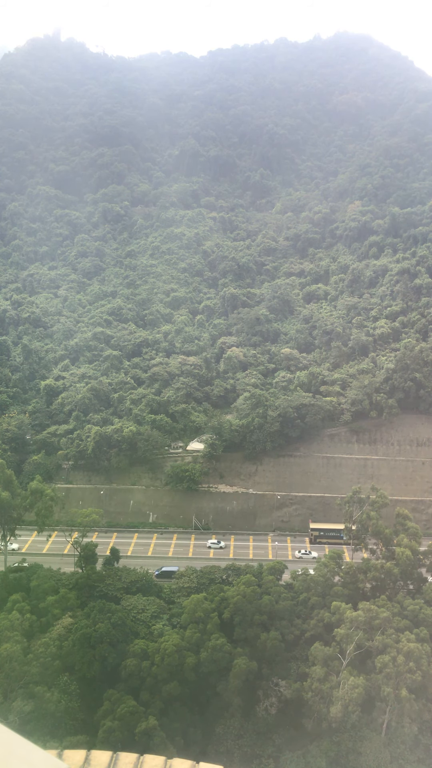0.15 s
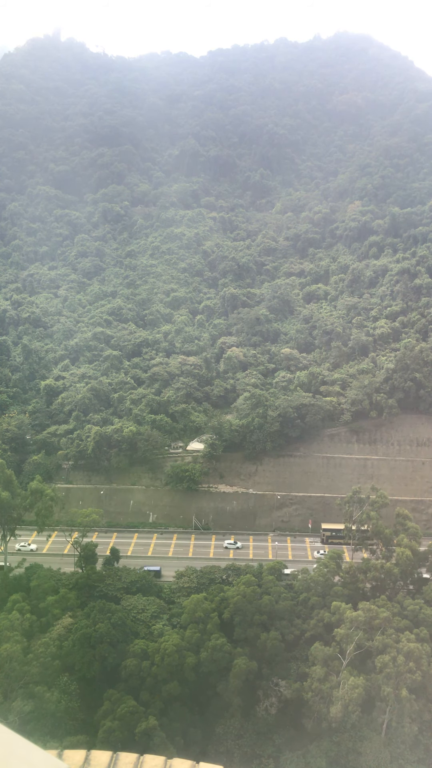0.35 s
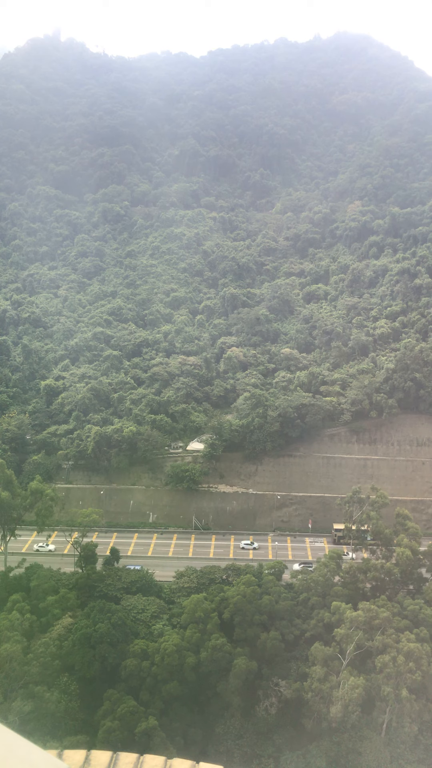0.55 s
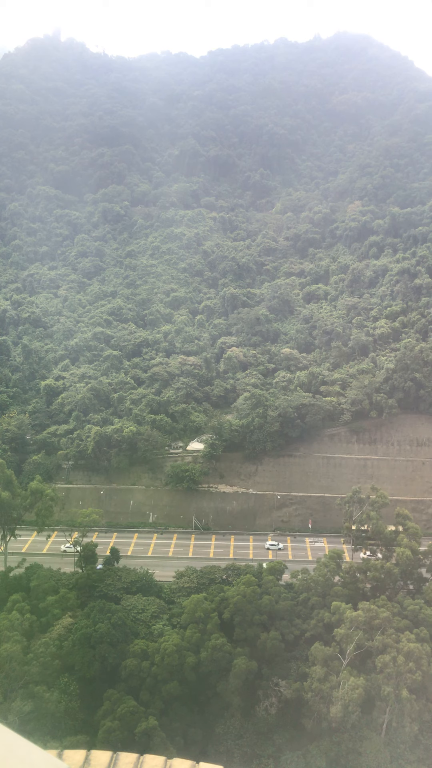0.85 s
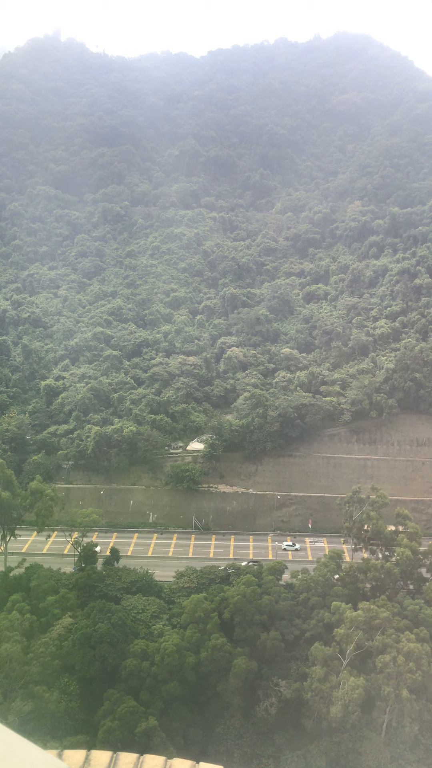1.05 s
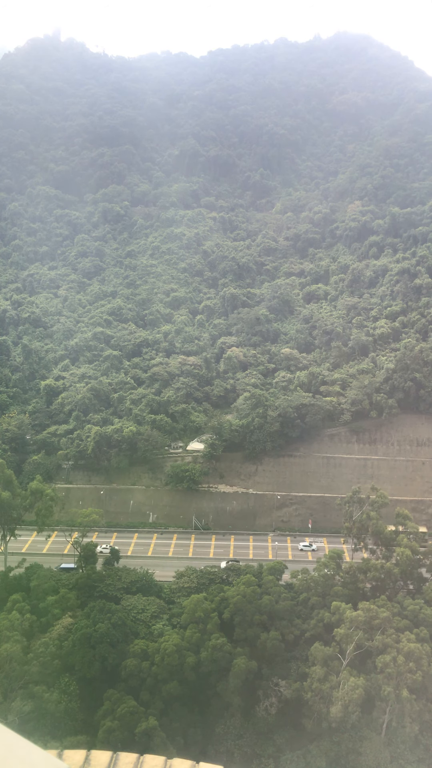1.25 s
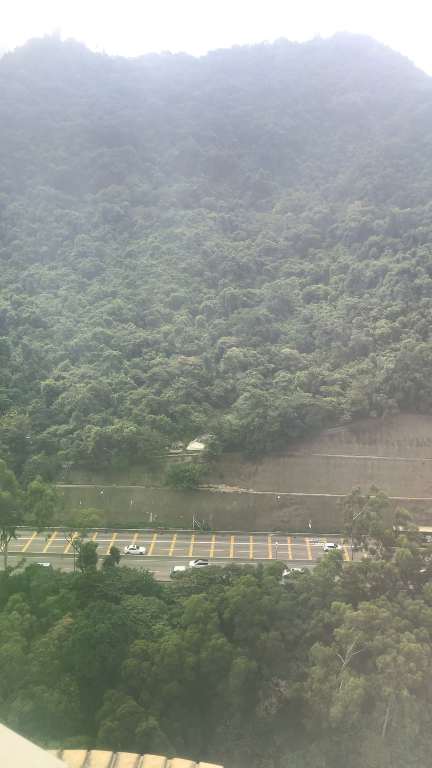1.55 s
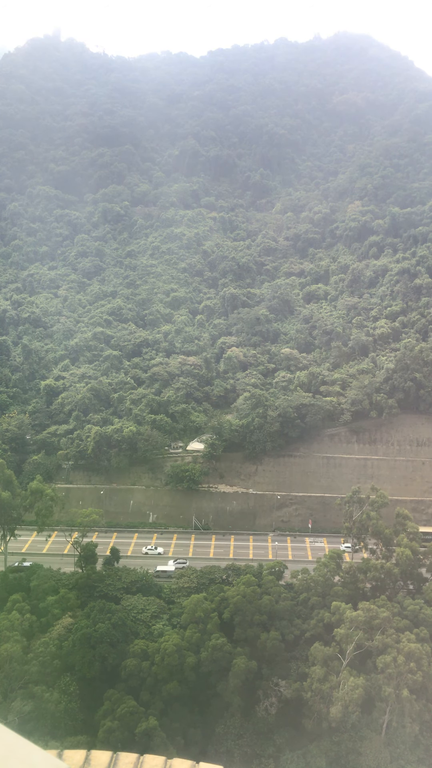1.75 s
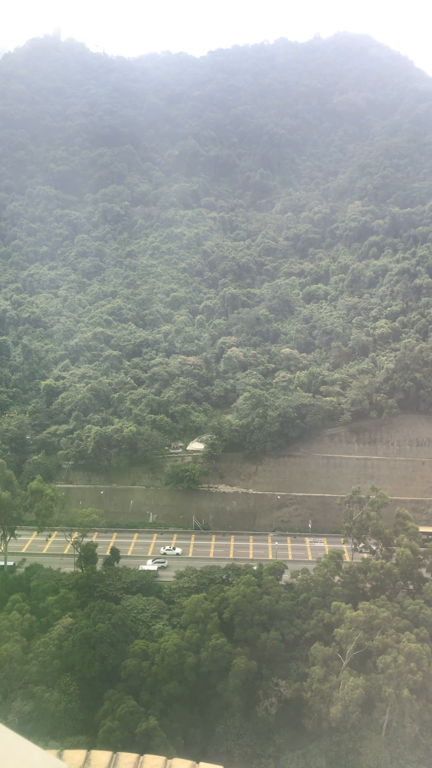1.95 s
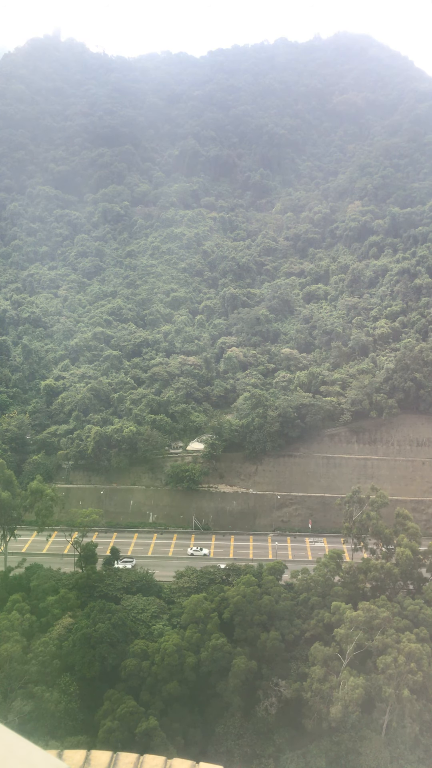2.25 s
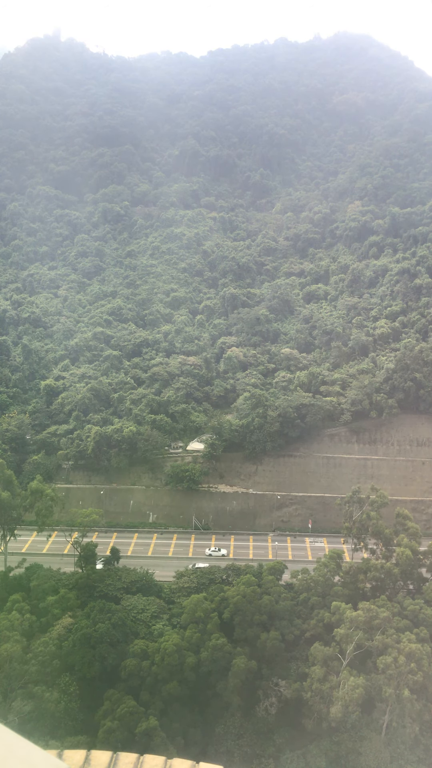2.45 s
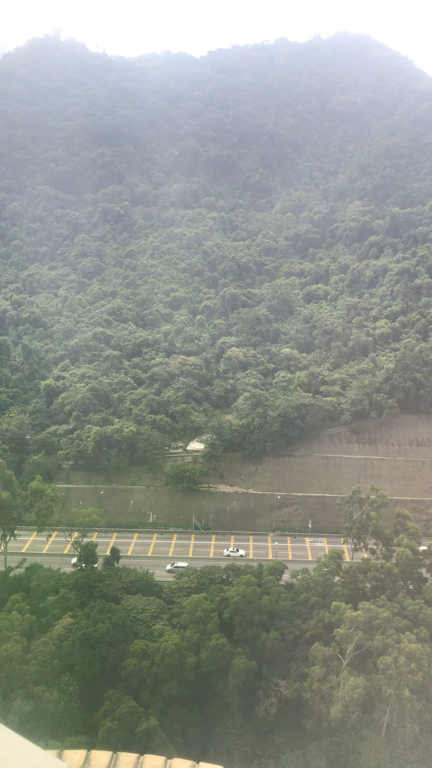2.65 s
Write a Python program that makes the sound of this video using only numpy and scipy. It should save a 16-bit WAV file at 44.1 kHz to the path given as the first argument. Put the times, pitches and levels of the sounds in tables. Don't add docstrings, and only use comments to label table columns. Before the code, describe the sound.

Heard from high above a busy road, deep exhaust drone and tyre noise rise through the middle and fade, while a sharp knock, then softer ones, echo briefly in a hard room near the microphone.

```python
import sys
import numpy as np
from scipy import signal
from scipy.fft import rfft, irfft
from scipy.io import wavfile
from scipy.ndimage import uniform_filter1d

SR = 44100
rng = np.random.default_rng(int(sys.argv[2]) if len(sys.argv) > 2 else 0)


def volts_from_decibels(level):
    exponent = np.asarray(level, float) / 20
    return 10 ** exponent


def wrap_up_sound(samples):
    columns = np.atleast_2d(samples).T
    tamed = np.clip(columns, -1, 1)
    steps = np.round(tamed * 32767).astype(np.int16)
    wavfile.write(sys.argv[1], SR, steps)


N = 121275


def evened(x):
    return x / np.sqrt(np.mean(x ** 2) + 1e-20)


def read(points, hz):
    f, value = np.transpose(points)
    return np.interp(np.log(hz + 1), np.log(f + 1), value)


def bell(x, centre, width):
    return np.exp(-.5 * ((x - centre) / width) ** 2)


def shaped(gain_db, size):
    a, b = rng.standard_normal(gain_db.shape[::-1] + (2,)).T
    return signal.istft((a + 1j * b) * volts_from_decibels(gain_db), nperseg=size, noverlap=size * 3 // 4)[1]


def fuzz(turns, width_hz):
    a, b = rng.standard_normal((N + SR // 4, 2)).T
    pole = np.exp(-np.pi * abs(width_hz) / SR)
    slow = signal.lfilter([1], [1, -2 * pole, pole * pole], a + 1j * b)[-N:]
    return evened((slow * np.exp(2j * np.pi * turns)).real)


def engine():
    # t/s, level/dB, firing f/Hz
    boom = [(0, -62, 82.9), (.16, -47, 88.1), (.38, -46.5, 90.2), (.46, -32, 90.4), (.56, -40.5, 87.7),
            (.72, -37.5, 88.3), (.92, -36.5, 87.8), (1.02, -30.5, 86.9), (1.15, -30.5, 86),
            (1.36, -34.5, 85.3), (1.46, -41, 82), (1.58, -32.5, 86.75), (1.74, -25, 85.2),
            (1.821, -24.5, 84.85), (1.92, -32, 92.65), (1.959, -45, 92.2), (2.16, -36.5, 86.1),
            (2.3, -50.5, 79.9)]
    # multiple, level/dB, blur/Hz
    orders = [(.74, -12, 7.4), (1.011, -10, 20), (1.751, -27.5, 7.3)]
    # t/s, depth/dB
    nulls = [(.67, -8), (.8, -10), (.94, -10), (1.1, -14), (1.68, -14), (1.775, -14), (1.87, -8)]
    null_s, blur_hz, blur_db, follow = .015, 14, -13, .4
    s, db, hz = np.transpose(boom)
    t = np.arange(N) / SR
    level, firing_hz = np.interp(t, s, db), np.interp(t, s, hz)
    turns = np.cumsum(firing_hz) / SR
    cancelled = sum(depth * bell(t, at, null_s) for at, depth in nulls)
    clean = np.sqrt(2) * np.sin(2 * np.pi * turns)
    out = volts_from_decibels(level + cancelled) * (clean + volts_from_decibels(blur_db) * fuzz(turns, blur_hz))
    loose = uniform_filter1d(level, SR // 4)
    loose = loose.mean() + follow * (loose - loose.mean())
    steady_turns = np.cumsum(uniform_filter1d(firing_hz, SR)) / SR
    return out + volts_from_decibels(loose) * sum(volts_from_decibels(d) * fuzz(k * steady_turns, w) for k, d, w in orders)


def second_vehicle():
    # t/s, level/dB, f/Hz
    drone = [(0.0, -65, 45.2), (0.23, -50, 46.43), (0.73, -60, 45.16), (0.87, -57, 37.6),
             (1.09, -36.5, 36.93), (1.22, -48.5, 45.42), (1.33, -40, 43.5), (1.55, -47, 50.39),
             (1.92, -33, 47.08), (2.04, -54, 47.7), (2.18, -41, 42), (2.44, -51, 42), (2.57, -56, 48.3),
             (2.75, -79, 53)]
    # t/s, level/dB, f/Hz
    upper = [(0.0, -72, 122), (0.05, -49, 120), (0.4, -67, 123.8), (0.67, -43.5, 121.1), (0.9, -58, 115.2),
             (1.0, -39, 115.9), (1.45, -39, 116.8), (1.78, -37.5, 120.5), (1.85, -43, 115.8),
             (2.27, -42.5, 119.1), (2.34, -62, 121.8), (2.75, -49, 117.1)]
    # level/dB, blur/Hz
    blurs = [(-4, 8), (3, 18)]
    t, out = np.arange(N) / SR, np.zeros(N)
    for rows, (blur_db, blur_hz) in zip((drone, upper), blurs):
        s, db, hz = np.transpose(rows)
        turns = np.cumsum(np.interp(t, s, hz)) / SR
        level = np.interp(t, s, db) - 3 - max(blur_db, 0)
        clean = np.sqrt(2) * np.sin(2 * np.pi * turns)
        out += volts_from_decibels(level) * (clean + volts_from_decibels(blur_db) * fuzz(turns, blur_hz))
    return out


def roar():
    # t/s, level/dB
    nearness = [(0.0, -67), (0.16, -60), (0.4, -55), (0.56, -55), (1.13, -53.5), (1.66, -53), (1.8, -54),
                (2.26, -60.5), (2.75, -62)]
    # f/Hz, density/dB per Hz
    body = [(18, -29), (35, -5.5), (120, -10.5), (200, -18.5), (520, -22), (790, -31.5), (1400, -30.5),
            (3500, -45)]
    # f/Hz, density/dB per Hz
    fizz = [(3500, 3.5), (4300, -1.5), (5000, -2.5), (6000, -3.5), (7500, -10), (8400, -14), (10000, -18.5),
            (11000, -19.5)]
    # f/Hz, share
    following = [(40, 1.6), (130, 0.73), (350, 0.47), (1200, 1.15), (6000, 0.68), (10000, 0.1)]
    # f/Hz, width/Hz, level/dB
    tread = [(1300, 76, 5), (956, 75, 3), (308, 19, 2)]
    level_db, patchy_db, surge_db = -39.5, 1.1, .3
    frames, hz = N // 512 + 5, np.fft.rfftfreq(2048, 1 / SR)
    t = np.arange(frames) * 512 / SR
    near = np.interp(t, *np.transpose(nearness))
    patches = uniform_filter1d(rng.standard_normal((frames, len(hz))).T, 8, 0)
    patches = evened(uniform_filter1d(patches, 8, 1))
    surge = evened(uniform_filter1d(rng.standard_normal(frames), 6))
    colour = read(body, hz) + read(fizz, hz) - fizz[0][1]
    colour = colour + sum(db * bell(hz, f, w) for f, w, db in tread)
    field = colour[:, None] + read(following, hz)[:, None] * (near - near.max())
    field = field + patchy_db * patches + surge_db * surge
    return volts_from_decibels(level_db) * evened(shaped(field, size=2048)[:N])


def hum():
    # f/Hz, level/dB, waver/Hz
    tones = [(324.3, -49, 2.8), (1236, -63, 16)]
    clean_share = 0.65
    t, out = np.arange(N) / SR, np.zeros(N)
    for hz, db, waver_hz in tones:
        clean = np.cos(2 * np.pi * hz * t) * (waver_hz < 10)
        out += volts_from_decibels(db) * (clean_share * clean + (1 - clean_share) * fuzz(hz * t, waver_hz))
    return out


def hiss():
    # f/Hz, density/dB per Hz
    noise_colour = [(300, -29), (3000, 9.5), (9000, -0.5), (10400, -10.5), (11500, 1), (15800, -1.5)]
    hz, t = np.fft.rfftfreq(256, 1 / SR)[:, None], np.arange(N // 64 + 5) * 64 / SR
    return volts_from_decibels(-78) * evened(shaped(read(noise_colour, hz) + 0 * t, size=256)[:N])


def knock(db, tilt, ring_hz, ring_db, share):
    # f/Hz, level/dB
    snap_colour = [(500, -37), (1000, 0), (2000, -1), (3700, -10), (4400, -10), (7400, -16.5),
                   (10000, -21.5), (15800, -34)]
    # f/Hz, decay time T60/s
    room = [(1000, 0.24), (3000, 0.28), (8000, 0.27), (15000, 0.16)]
    build_s, snap_db, ripple_db = 0.022, 10, .8
    flutter_s, flutter_db = .0115, -4
    hz, t = np.fft.rfftfreq(256, 1 / SR)[:, None], np.arange(300) * 64 / SR
    colour = read(snap_colour, hz) + tilt * np.log2((hz + 50) / 3000)
    colour = colour + ring_db / (1 + ((hz - ring_hz) / (0.067 * ring_hz)) ** 2)
    colour = colour + ripple_db * evened(uniform_filter1d(rng.standard_normal(hz.shape), 2, 0))
    flutter = flutter_db * np.cos(2 * np.pi * (t - .003) / flutter_s) * (hz < 3000)
    decay = 60 * np.maximum(t / share - build_s, 0) / read(room, hz)
    sound = shaped(colour + flutter - decay, size=256)
    t = np.arange(len(sound)) / SR
    sound = sound / np.sqrt(np.mean(sound[:1300] ** 2))
    onset = np.minimum(t / .001, 1)
    return volts_from_decibels(db + snap_db * np.exp(-t / .003)) * onset * sound


def knocks():
    # t/s, level/dB, tilt/dB per octave, ring f/Hz, ring level/dB
    small = [
        (.206, -64.5, 4, 6000, 11),
        (1.271, -48, -2.5, 1800, 0),
        (1.769, -70, 2, 11900, 13),
        (2.711, -71, 8.5, 8200, 12),
    ]
    # t/s, level/dB, tilt/dB per octave, ring f/Hz, ring level/dB
    large = [
        (.431, -39.5, -0.25, 7450, 4.5),
        (2.095, -52, 1.1, 4300, 2),
        (2.223, -56, -1, 1300, 11),
    ]
    out = np.zeros(N + SR)
    for rows, share in ((large, 1), (small, 0.74)):
        for s, *row in rows:
            sound = knock(*row, share)
            out[round(s * SR):][:len(sound)] += sound
    return out[:N]


def passers():
    # centre t/s, half length/s, start f/Hz, end f/Hz, level/dB
    brief = [(.4, .09, 258, 248, -52), (.72, .17, 560, 552, -56), (.97, .1, 535, 525, -55),
             (.98, .06, 255, 250, -51), (1.02, .08, 358, 352, -53), (1.45, .1, 432, 426, -52),
             (1.28, .07, 388, 386, -55), (1.75, .17, 358, 345, -52), (1.92, .08, 262, 255, -52),
             (2.2, .12, 64, 60, -46)]
    blur, blur_hz = 1.1, 7.9
    t, out = np.arange(N) / SR, np.zeros(N)
    for s, half, from_hz, to_hz, db in brief:
        turns = np.cumsum(np.interp(t, [s - half, s + half], [from_hz, to_hz])) / SR
        tone = np.cos(2 * np.pi * turns) + blur * fuzz(turns, blur_hz)
        out += volts_from_decibels(db) * tone * np.exp(-.5 * ((t - s) / half) ** 4)
    return out


def rustles():
    centres = [1.522, 2.2, 1.5]
    # half length/s, level/dB, low edge f/Hz
    soft = [
        (0.024, -65, 12500),
        (0.19, -72.5, 5200),
        (0.066, -73, 4600),
    ]
    hz, frame_t = np.fft.rfftfreq(256, 1 / SR)[:, None], np.arange(N // 64 + 5) * 64 / SR
    t, out = np.arange(N) / SR, np.zeros(N)
    for s, (half, db, edge_hz) in zip(centres, soft):
        slope = 8 * np.log2(np.clip(hz / edge_hz, .02, 1))
        bright = evened(shaped(slope + 0 * frame_t, size=256)[:N])
        out += volts_from_decibels(db) * bright * bell(t, s, half)
    return out


def scene():
    street = engine() + second_vehicle() + roar() + hum() + passers()
    indoors = hiss() + knocks() + rustles()
    return (street + indoors)[None]


def low_pass(x):
    return signal.sosfilt(signal.butter(12, 16050, fs=SR, output="sos"), x)


def record(dry):
    # f/Hz, width/Hz, depth/dB
    dips = [(185, 8.4, -2), (4970, 200, -4), (8550, 170, -2), (10500, 250, -2), (1144, 29, -2.5)]
    low_cut_hz, top_hz = 27, 15760
    hz = np.fft.rfftfreq(2 * N, 1 / SR)
    gain = volts_from_decibels(sum(db * bell(hz, f, w) for f, w, db in dips))
    gain = gain / np.sqrt(1 + (low_cut_hz / (hz + 1)) ** 16) * (hz < top_hz)
    mix = irfft(rfft(dry, 2 * N) * gain)[:, :N]
    return low_pass(mix)


dry = scene()
out = record(dry)
wrap_up_sound(out)
```